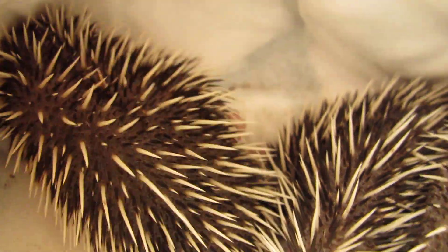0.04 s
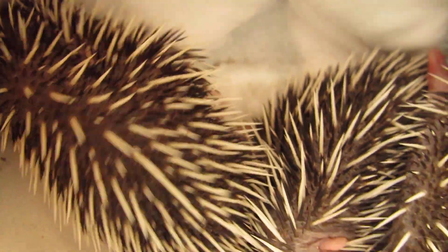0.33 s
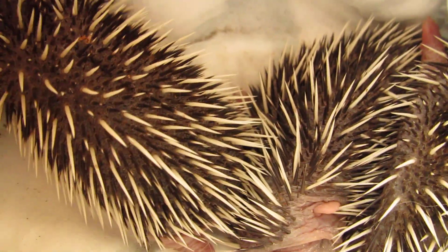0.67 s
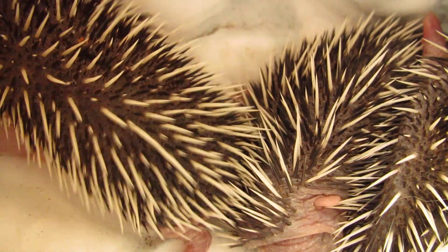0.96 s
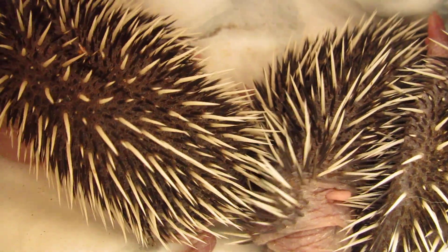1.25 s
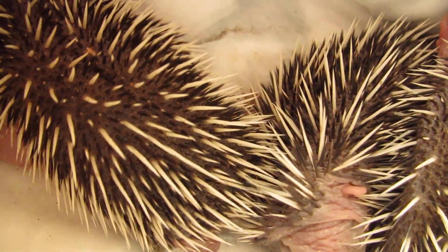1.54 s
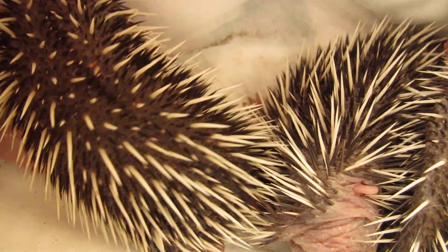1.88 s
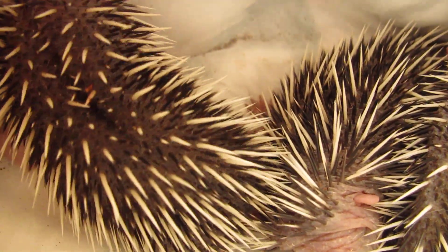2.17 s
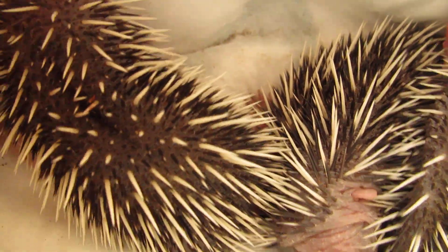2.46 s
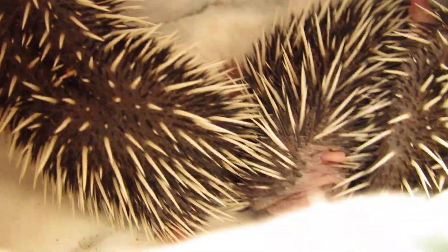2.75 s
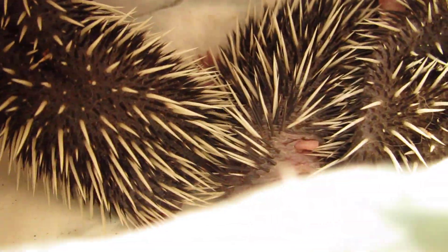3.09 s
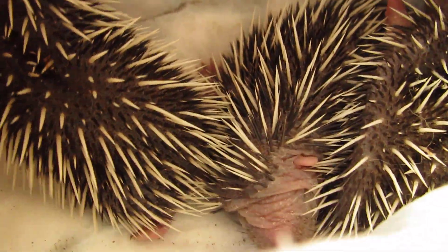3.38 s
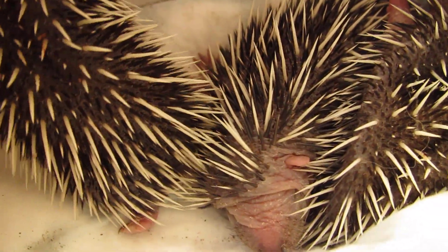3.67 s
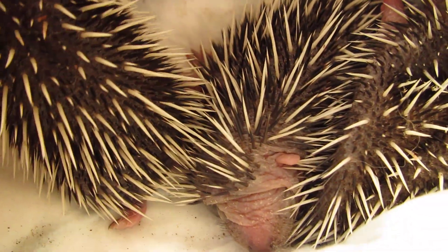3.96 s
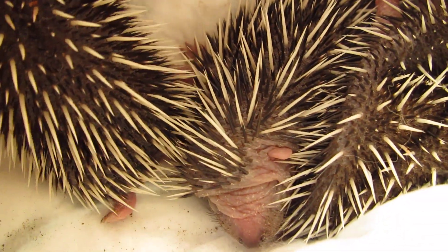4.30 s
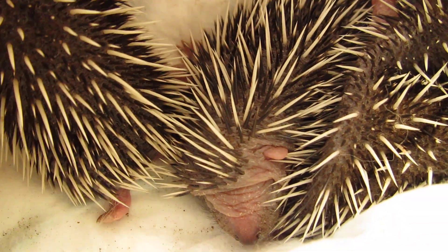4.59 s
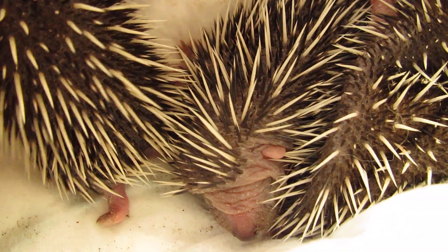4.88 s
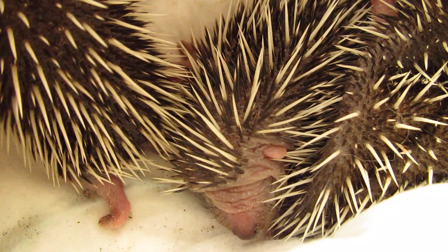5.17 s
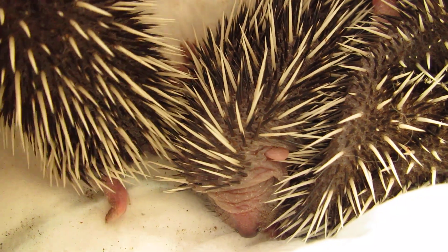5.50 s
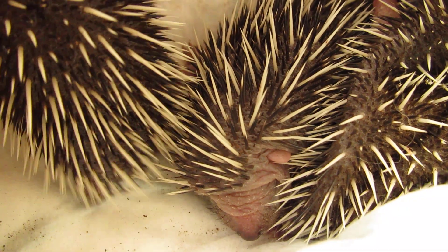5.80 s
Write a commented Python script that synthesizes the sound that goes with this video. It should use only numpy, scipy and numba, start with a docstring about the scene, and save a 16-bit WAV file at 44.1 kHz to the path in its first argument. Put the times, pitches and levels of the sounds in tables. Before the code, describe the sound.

Two short, shrill squeaks from a baby hedgehog follow close, quiet scratching of spines and light bumps on cloth bedding.

```python
"""Baby hedgehogs in a towel

Right beside a camera, spines scratch and tick, paws pad and the bedding gets knocked. One animal
gives a voiceless hiss, then two piercing whistled squeaks near 11 kHz. They overload the right
input, and the camera's limiter pulls the quiet room down for the rest of the scene."""
import sys
import numpy as np
from scipy import signal
from scipy.fft import rfft, irfft, next_fast_len
from scipy.io import wavfile
from scipy.ndimage import uniform_filter1d
from numba import njit

SR = 44100
rng = np.random.default_rng(int(sys.argv[2]) if len(sys.argv) > 2 else 0)


def wav_out(sig):
    """Save sig, one row per channel (or a flat mono array), as 16-bit PCM at SR to the path in sys.argv[1]."""
    wavfile.write(sys.argv[1], SR, np.round(np.clip(np.atleast_2d(sig).T, -1, 1) * 32767).astype(np.int16))


N = 266364
TIME = np.arange(N) / SR


def undb(db):
    """Decibels to gain."""
    return 10 ** (np.asarray(db) / 20)


def unit(x):
    """Scale to rms 1."""
    return x / np.sqrt(np.mean(x ** 2))


def unit_hit(x):
    """Give a short sound the energy of five milliseconds at rms 1."""
    return x / np.sqrt(np.sum(x ** 2, axis=-1, keepdims=True) / (.005 * SR))


def walk(rate):
    """Smooth random wandering, rate turns a second, with a spread near 1."""
    hold = int(SR / rate)
    stairs = np.repeat(rng.standard_normal(N // hold + 1), hold)
    return uniform_filter1d(stairs, hold)[:N] * np.sqrt(1.5)


def hump(start, length, shape=1):
    """A smooth swell from nothing up to 1 and back."""
    return np.maximum(np.sin(np.pi * np.clip((TIME - start) / length, 0, 1)), 0) ** shape


def tone(hz):
    """A sine at rms 1 that follows a pitch curve."""
    return np.sqrt(2) * np.sin(2 * np.pi * np.cumsum(hz) / SR)


def add(track, start, sound):
    """Mix a short sound in at start seconds."""
    i = int(start * SR)
    track[..., i:i + sound.shape[-1]] += sound[..., :N - i]


def stereo(mid, side=0, side_db=0, pan_db=0):
    """Mid and side to left and right; pan_db is left minus right."""
    return (mid + undb(side_db) * side * np.array([[1], [-1]])) * undb([[pan_db / 2], [-pan_db / 2]])


def colour(x, points, size=4096):
    """Minimum-phase EQ through (Hz, dB) points; white noise keeps its level."""
    hz, db = np.transpose(points)
    bins_hz = np.fft.rfftfreq(size, 1 / SR)
    gain = unit(undb(np.interp(np.log(bins_hz + 1), np.log(hz), db)))
    cepstrum = irfft(np.log(gain))
    cepstrum[1:size // 2] *= 2
    cepstrum[size // 2 + 1:] = 0
    impulse = irfft(np.exp(rfft(cepstrum)))
    return signal.fftconvolve(x, impulse[None], axes=1)[:, :N]


def butter(order, hz, kind):
    """A Butterworth filter as second-order sections."""
    return signal.butter(order, hz, kind, fs=SR, output="sos")


def tilt(x, db):
    """Raise the treble above 7 kHz against the rest by db."""
    low = signal.sosfiltfilt(butter(2, 7000, "low"), x, padlen=0)
    return low * undb(-db / 2) + (x - low) * undb(db / 2)


# The dark colour of the room tone. Each row: frequency in Hz, relative level in dB.
ROOM_EQ = [(30, 2), (60, 3), (100, -4.5), (160, -2), (220, -1), (310, 1.5), (400, 0.5), (800, 2),
           (2000, -7), (3200, -16.5), (4300, -30.5), (5400, -34), (6600, -33), (10000, -24), (15500, -29)]
# An appliance's faint hum. Each row: pitch in Hz, base level in dB, share of the swell from 0 to 1.
HUM_TONES = [(310.6, -65.5, .95), (822, -67, .15)]
# The hum comes and goes. Each row: time in seconds, boost in dB.
HUM_SWELL = [(0, 6), (1.2, 3.5), (2.3, 3), (2.7, 5.5), (3.1, 1), (4.15, -4), (4.38, 12.5), (4.55, 10),
             (4.8, 3), (6, -0.5)]


def room_tone(air_db=-56.5):
    """Quiet indoor air with the wavering hum of an appliance."""
    air = colour(stereo(*rng.standard_normal((2, N)), side_db=6.5, pan_db=-.5), ROOM_EQ)
    swell_db = np.interp(TIME, *np.transpose(HUM_SWELL))
    hum = 0
    for hz, db, share in HUM_TONES:
        hum += undb(db + share * swell_db + 2.1 * walk(9)) * tone(hz + 6 * walk(25))
    return air * undb(air_db + .3 * walk(4.2)) + hum


def room_echo(x, db, t60_s=.2):
    """The faint diffuse answer of a small furnished room."""
    t = np.arange(SR // 3) / SR
    tail = rng.standard_normal((2, len(t))) * undb(-60 * t / t60_s) * (t > .004)
    tail /= np.sqrt(np.sum(tail ** 2) / 2)
    return undb(db) * signal.fftconvolve(x, tail, axes=1)[:, :N]


# Soft footfalls. Each row: start in seconds, level in dB.
PAW_STEPS = [(0.365, -27.5), (0.5172, -32), (3.492, -30.5), (3.678, -39.5), (3.923, -43.5), (4.374, -46.5),
             (4.555, -51)]


def paw_steps(ring_hz=335, push_s=.0021, sag_hz=170, sag_s=.005, sag_db=-14):
    """A soft paw pushes slowly, so only the deepest ring swells and dies while the padding sags."""
    t = np.arange(SR // 12) / SR

    def press(hz, swell_s):
        return unit_hit((t / swell_s) ** 2 * np.exp(-t / swell_s) * np.sin(2 * np.pi * hz * t))

    pad = press(ring_hz, push_s) + undb(sag_db) * press(sag_hz, sag_s)
    out = np.zeros(N)
    for start, db in PAW_STEPS:
        add(out, start, undb(db) * pad)
    return stereo(out, pan_db=-1)


def grains(rate, spread_db, smooth_db):
    """Mid and side trains of tiny uneven slips, at the same moments, over smooth friction noise."""
    slipping = rng.random(N) < rate / SR
    size = slipping * undb(spread_db * np.minimum(rng.exponential(size=N), 3))
    slips = unit(size * rng.choice([-1, 1], (2, N)))
    return unit(slips + undb(smooth_db) * rng.standard_normal((2, N)))


# The colours of crisp spines and dull cloth. Each row: frequency in Hz, relative level in dB.
SPINE_EQ = [(1200, -29), (2300, 3), (3300, 7), (4300, -1.5), (5500, 5.5), (6700, -5), (8500, 5), (10800, 4),
            (12500, -1.5), (15500, 0)]
TOWEL_EQ = [(60, -20), (150, -8.5), (330, 2), (600, -5.5), (1100, -9), (2100, -6), (3000, -12.5),
            (5000, -25)]
# Shuffling moves. Each row: start in seconds, length in seconds, spine scratch in dB, towel rub in dB.
STROKES = [(0.386, 0.12, -75, -52), (0.65, 0.16, -61, -50), (0.838, 0.045, -42, -39.5),
           (0.893, 0.064, -45, -38.5), (0.96, 0.1, -47.5, -34), (1.254, 0.25, -80, -52),
           (1.457, 0.057, -52, -46), (1.527, 0.033, -46, -40.5), (1.666, 0.083, -54.5, -48.5),
           (1.703, 0.15, -48, -46), (1.857, 0.17, -49.5, -49.5), (1.998, 0.3, -54.5, -53),
           (2.303, 0.18, -46.5, -48), (2.47, 0.07, -47, -47.5), (2.502, 0.13, -49.5, -47.5),
           (2.663, 0.16, -44.5, -45), (3.005, 0.048, -50.5, -55), (3.097, 0.074, -40.5, -43),
           (3.146, 0.094, -47.5, -49.5), (3.277, 0.21, -55.5, -54.5), (3.467, 0.16, -51.5, -51),
           (3.566, 0.046, -46, -50), (3.704, 0.067, -55.5, -48), (3.865, 0.083, -60, -59),
           (4.22, 0.73, -65.5, -79), (4.656, 0.093, -63, -54), (4.94, 0.04, -58, -74),
           (5.412, 0.28, -55, -68), (5.705, 0.029, -53, -49), (5.745, 0.34, -53, -47.5),
           (5.876, 0.038, -43.5, -42.5)]


def shuffle(prickle_db=-8.5, idle_spines_db=-62.5, idle_towel_db=-58):
    """Spines catch and slip in dry spurts while the towel rubs; between strokes they only brush."""
    fidget = undb(1.35 * walk(13))  # the animals never lie quite still
    scratch, rub = np.zeros(N), undb(idle_towel_db) * fidget
    for start, length, spine_db, towel_db in STROKES:
        stroke = hump(start, length, shape=1.15)
        scratch = np.hypot(scratch, undb(spine_db) * stroke)
        rub = np.hypot(rub, undb(towel_db) * stroke)
    scratch *= unit(undb(.8 * walk(80)))  # the coat presses unevenly
    spines = stereo(*grains(rate=700, spread_db=4, smooth_db=-10), side_db=-8, pan_db=-3)
    spines *= unit(undb(3.4 * walk(420)))  # the grains come in spurts
    stout_tips = unit(tilt(grains(rate=65, spread_db=2, smooth_db=-30), -16))
    fine_tips = unit(tilt(grains(rate=65, spread_db=2, smooth_db=-30), 16))
    prickles = stereo(*(stout_tips + fine_tips), side_db=-15.5, pan_db=-1)
    brush = stereo(*grains(rate=500, spread_db=5, smooth_db=2), side_db=-6, pan_db=-3)
    towel = stereo(*grains(rate=600, spread_db=5, smooth_db=-4.5), side_db=-15.5, pan_db=-2.5)
    coat = (spines + undb(prickle_db) * prickles) * scratch + brush * fidget * undb(idle_spines_db)
    return colour(coat, SPINE_EQ) + colour(towel * rub, TOWEL_EQ)


def bedding_ring(modes, t, detune, push_s):
    """Heavily damped modes, tuned a little differently at each spot; the padding softens their start."""
    swing = sum((-1) ** k * undb(db - 60 * t / t60) * np.sin(2 * np.pi * hz * (1 + detune[k]) * t)
                for k, (hz, t60, db) in enumerate(modes))
    return unit_hit(swing * (1 - np.exp(-t / push_s)))


def tip_snap(bright_db, tail_s, tail_db):
    """A hard tip lets go: a sharp pulse in the mid, then a brief rattle in both mid and side."""
    t = np.arange(-8, SR // 25) / SR
    pulse = np.array([[1], [0]]) * (t == 0)
    rattle = np.exp(-t / tail_s) * (t > 0) * rng.standard_normal((2, len(t)))
    return unit_hit(tilt(pulse + undb(tail_db) * rattle, bright_db))


# The bedding's deep and bright rings.
# Each row: frequency in Hz, seconds to fade by 60 dB, relative level in dB.
THUMP_MODES = [(343, 0.021, -3.5), (616, 0.009, 1)]
RAP_MODES = [(833, 0.0082, 2), (1426, 0.0089, 2), (1990, 0.0089, 2.4)]
# The colour of a contact tick. Each row: frequency in Hz, relative level in dB.
CONTACT_EQ = [(1200, -6.5), (2600, -6.5), (3400, 6.5), (4300, -4.5), (5500, 3), (6500, -4.5), (8500, 5.5),
              (10600, 4), (11700, -6.5), (15500, 0)]
# Hits on the bedding. Each row: start in seconds, deep thump in dB, bright rap in dB, tick in dB.
KNOCKS = [(0.1675, -46, -38, -43), (0.2169, -49, -42, -51.5), (.2622, -39, -39.5, -46.5),
          (0.3081, -26.5, -39, -40), (0.3168, -24.5, -33, -41.5), (0.3663, -32, -51, -51),
          (0.417, -40, -45, -48.5), (.4763, -42, -52, -51), (0.7137, -42.5, -51, -57),
          (0.727, -44, -44, -55), (0.7808, -40, -41.5, -45.5), (0.789, -46, -48, -46),
          (0.7926, -32, -35, -36.5), (0.7989, -43.5, -42, -43), (0.8464, -36.5, -43, -41),
          (0.8605, -29, -31, -45), (.8646, -26.5, -26.5, -31), (0.8687, -28, -30.5, -33),
          (0.8827, -45, -46, -49), (0.8885, -43, -42, -51), (0.896, -43, -33.5, -40.5),
          (.909, -40.5, -46, -49.5), (.914, -48, -34, -48), (0.92, -35, -36, -42),
          (0.9243, -38, -29.5, -30.5), (0.9268, -36, -28, -39), (0.956, -32, -32, -35),
          (0.9585, -26.5, -35, -34), (0.9615, -32, -42.5, -29.5), (0.9643, -18, -16.5, -25.5),
          (0.9778, -37, -35, -39), (.981, -21.5, -26, -30), (0.9857, -29, -29, -38.5),
          (0.9929, -18, -26, -30), (0.9985, -23, -28, -39), (1.0038, -32, -35, -44),
          (1.0149, -24.5, -27.5, -39), (1.025, -38, -45, -48), (1.0304, -23, -31, -39),
          (1.0644, -36, -38, -43), (1.0669, -47, -44, -50), (1.1338, -52, -40.5, -50),
          (1.302, -42, -43, -59), (1.477, -46, -49, -60), (1.49, -40.5, -45, -44), (1.5395, -44, -46, -42),
          (1.5434, -57, -36, -54), (1.5804, -39, -41.5, -47.5), (1.699, -59, -45, -53),
          (1.73, -59, -43, -53), (1.758, -56, -43.5, -50), (1.8008, -47, -46, -49), (1.9565, -32, -39, -44),
          (2.546, -50, -43.5, -46), (3.3221, -38.5, -47, -45), (3.4004, -43.5, -53, -46),
          (3.819, -45.5, -50, -51), (4.379, -64, -50.5, -71), (4.7752, -59, -43, -51),
          (5.7523, -33.5, -47.5, -41.5), (5.7575, -36, -43.5, -42.5), (5.804, -41, -38.5, -40),
          (5.858, -60, -41, -44), (6.0081, -40.5, -52, -58)]


def knocks(detune_spread=.105, low_cut_hz=305):
    """Claws and spines strike the padded bedding: a thump, a rap and the tick of the contact."""
    t = np.arange(SR // 25) / SR
    body, contact = np.zeros(N), np.zeros((2, N))
    for start, thump_db, rap_db, tick_db in KNOCKS:
        detune = detune_spread * rng.standard_normal((2, 3))
        add(body, start, undb(thump_db) * bedding_ring(THUMP_MODES, t, detune[0], push_s=.00024))
        add(body, start, -undb(rap_db) * bedding_ring(RAP_MODES, t, detune[1], push_s=.00074))
        add(contact, start, undb(tick_db) * tip_snap(bright_db=-4, tail_s=.0013, tail_db=-7.5))
    body = signal.sosfilt(butter(4, low_cut_hz, "high"), body)
    return stereo(body, pan_db=-3) + colour(stereo(*contact, side_db=-11, pan_db=-3.5), CONTACT_EQ)


# Single spines flicking. Each row: start in seconds, level in dB, treble tilt in dB.
SPINE_TICKS = [(0.1666, -39, 12), (1.198, -41, 9), (1.3442, -44, 1), (1.3703, -45.5, -29), (1.409, -49, 5),
               (1.4763, -49, 7), (1.4995, -43, 3), (1.5372, -43, -20), (1.7053, -45.5, -3),
               (1.787, -50, -6), (1.9263, -48, 4), (1.9695, -44, -2), (2.172, -46, 15), (2.1813, -41, -1),
               (2.202, -35.5, 6), (2.274, -38, -1), (2.282, -33.5, 4), (2.2963, -46, 4), (2.3083, -46, -7),
               (2.317, -47, -12), (2.3438, -29, 1.5), (2.3571, -46, -5), (2.3862, -45, 1),
               (2.4371, -50, -7), (2.51, -45, -9), (2.577, -50, 5), (2.582, -40.5, -5), (2.592, -45, -14),
               (2.6064, -46, -11), (2.6218, -53, -12), (2.633, -54, -4), (2.6395, -55, -11),
               (2.7046, -44, -15), (2.7274, -48, -4), (2.7536, -40.5, -2), (2.777, -48, 0),
               (2.78, -50, -12), (2.871, -53.5, -5), (3.046, -38.5, -6), (3.0624, -53, 5), (3.114, -33, -1),
               (3.1162, -34.5, -5), (3.1314, -49, 5), (3.145, -35.5, 10), (3.1507, -32.5, 4),
               (3.156, -47, 1), (3.1853, -37, 9), (3.1934, -49, 7), (3.2295, -41, 3), (3.273, -42, 5),
               (3.332, -48, 15), (3.3658, -43, 14), (3.5156, -51, 2), (3.537, -46.5, 8), (3.5863, -37, 25),
               (3.6076, -50, 5), (3.7255, -48, -7), (3.7457, -52, -7), (3.9144, -48.5, -17),
               (3.9285, -53, -2), (3.9417, -48.5, -10), (4.051, -53, -21), (4.949, -43, 8.5)]


def spine_ticks(bedding_db=-15, detune_spread=.089):
    """Caught spines snap free, stout ones dull and fine ones bright; the bedding answers faintly."""
    t = np.arange(SR // 25) / SR
    snaps, body = np.zeros((2, N)), np.zeros(N)
    for start, db, bright_db in SPINE_TICKS:
        add(snaps, start, undb(db) * tip_snap(bright_db, tail_s=.0006, tail_db=-15))
        detune = detune_spread * rng.standard_normal(5)
        ring = bedding_ring(THUMP_MODES + RAP_MODES, t, detune, push_s=.00049)
        add(body, start, undb(db + bedding_db) * ring)
    return colour(stereo(*snaps, side_db=-12.5, pan_db=-4), SPINE_EQ) + body


# Tiny calls. Each row: start in seconds, length in seconds, pitch in Hz, level in dB.
PEEPS = [(1.675, 0.028, 3820, -52), (4.8, 0.064, 1050, -57.5)]


def peeps(waver=.035, waver_rate=900):
    """Faint little tones with a fast, random shake in their pitch."""
    return sum(undb(db) * hump(start, length) * tone(hz * (1 + waver * walk(waver_rate)))
               for start, length, hz, db in PEEPS)


# The throat's colour, peaking near 11 kHz. Each row: frequency in Hz, relative level in dB.
THROAT_EQ = [(200, -61.5), (1500, -29), (3800, -23.5), (5700, -10), (6600, -16.5), (9400, -17),
             (10200, -2.5), (10900, 1.5), (11800, -7.5), (13000, -13), (15500, -24.5)]
# Voiceless puffs. Each row: start in seconds, length in seconds, level in dB.
HISSES = [(4.657, 0.099, -39), (4.947, 0.04, -41.5)]


def throat_air(breath_db=-44, build_s=.024, trail_s=.009, pop_db=-11, pop_s=.00042):
    """Turbulence in the narrow throat resonance: the hisses and the breath around each squeak."""
    flow = sum(undb(db) * hump(start, length, shape=.93) for start, length, db in HISSES)
    for start, length, *_, lead_db in SQUEAKS:
        flow += undb(lead_db + pop_db) * np.exp(-np.abs(TIME - start) / pop_s)  # a pop as it catches
        before, after = np.maximum(start - TIME, 0), np.maximum(TIME - start - length, 0)
        flow += undb(breath_db) * np.exp(-before / build_s - after / trail_s)
    air = stereo(*rng.standard_normal((2, N)), side_db=-8, pan_db=-6)
    return colour(air * flow, THROAT_EQ)


# The two piercing whistles. Each row: start in seconds, length in seconds, held pitch in Hz, drift in
# Hz per second, opening scoop in Hz, final drop in Hz, level in dB, seconds to the hardest push,
# sag by the end in dB, held pan (left minus right) in dB, lead-in tone level in dB.
SQUEAKS = [(4.9808, .1094, 11520, 900, 530, 380, 6.3, .025, 3.8, -3.1, -2.5),
           (5.3068, .094, 11335, -300, 225, 760, 6.8, .033, 8.0, -9.3, -15)]


def squeaks(lead_hz=10170, lead_s=.0007, attack_s=.0007, release_s=.004, left_early_s=1e-5):
    """A pure whistle catches from a lower lead-in tone, scoops up to its note, sags and drops."""
    lead_pan_db, scoop_pan_db = -2.5, -8.5
    out = np.zeros((2, N))
    for (start, length, held_hz, drift, scoop_hz, drop_hz,
         level_db, push_at_s, sag_db, held_pan_db, lead_db) in SQUEAKS:
        t = np.clip(TIME - start, 0, length)
        caught = np.minimum(t / attack_s, 1)  # crossfade from lead-in to whistle
        scoop = np.exp(-(t / (.0065 + scoop_hz / 28000)) ** 2)  # a wider scoop takes longer
        drop = np.exp((t - length) * 80000 / drop_hz)  # always ends falling 80000 Hz per second
        whistle_hz = held_hz + drift * t - scoop_hz * scoop - drop_hz * drop
        hz = (1 - caught) * lead_hz + caught * whistle_hz

        # the effort builds, peaks early and flutters a little
        rise_db = -1.5 * np.exp(-(t / .010) ** 2)
        push_db = 1.55 * np.exp(-np.abs((t - push_at_s) / .023) ** 3)
        whistle_db = level_db + rise_db + push_db + .16 * walk(300) - sag_db * (t / length) ** 4
        db = (1 - caught) * lead_db + caught * whistle_db
        gate = np.exp(np.minimum(TIME - start, 0) / lead_s) * np.minimum((length - t) / release_s, 1)
        envelope = uniform_filter1d(undb(db) * gate, size=30)

        whistle_pan_db = held_pan_db + (scoop_pan_db - held_pan_db) * scoop
        pan_db = (1 - caught) * lead_pan_db + caught * whistle_pan_db
        phase = 2 * np.pi * np.cumsum(hz * (1 + .0006 * walk(1200))) / SR
        left = undb(pan_db) * np.sin(phase + 2 * np.pi * hz * left_early_s)
        out += np.sqrt(2) * envelope * np.array([left, np.sin(phase)])
    return out


def scene():
    """The squeaks are beamed straight at the microphones, so they carry less room than the movements."""
    voice = squeaks() + throat_air() + peeps()
    movement = shuffle() + knocks() + spine_ticks() + paw_steps()
    return voice + room_echo(voice, db=-48.5) + movement + room_echo(movement, db=-14.5) + room_tone()


def overload(x, low=-3.5, high=3.2, rasp=.02, waver=.08, spill_db=-10, converter_hz=48000):
    """Clipping at the converter's rate folds the overtones down as faint side tones."""
    jitter = unit(signal.sosfilt(butter(3, [600, 4200], "band"), rng.standard_normal(N)))
    bias = rasp * jitter + waver * walk(700)  # an unsteady threshold makes them raspy
    fast, bias = (signal.resample_poly(v, converter_hz, SR, axis=-1) for v in (x, bias))
    excess = fast - np.clip(fast, low + bias, high + bias)
    excess = signal.resample_poly(excess, SR, converter_hz, axis=1)[:, :N]
    excess = signal.sosfiltfilt(butter(2, 600, "high"), excess)
    return x - excess - undb(spill_db) * excess[::-1]  # they spill into the other channel


@njit
def limiter(peak, ceiling, attack_s, release_s):
    """Gain that dives as soon as the peaks pass the ceiling and creeps back slowly."""
    attack, release = 1 / (attack_s * SR), 1 / (release_s * SR)
    gain, held, envelope = np.ones(len(peak)), 0., ceiling
    for i in range(len(peak)):
        held = max(peak[i], held * .995)
        envelope += (held - envelope) * (attack if held > envelope else release)
        envelope = max(envelope, ceiling)
        gain[i] = ceiling / envelope
    return gain


def record(dry, clip_level=.8, top_hz=16500):
    """The input overloads on the right; the camera trims bass and treble, then limits."""
    trimmed = signal.sosfilt(butter(4, [90, 12900], "band"), overload(dry))
    peak = np.abs(signal.hilbert(trimmed, next_fast_len(N))[:, :N]).max(axis=0)
    gain = limiter(peak, ceiling=.66, attack_s=.001, release_s=3.5)
    # a sudden squeak outruns the limiter and clips with a crack
    clipped = np.clip(trimmed * gain, -clip_level, clip_level)
    return signal.sosfilt(signal.ellip(8, .2, 70, top_hz, fs=SR, output="sos"), clipped)


dry = scene()
out = record(dry)
wav_out(out)
```